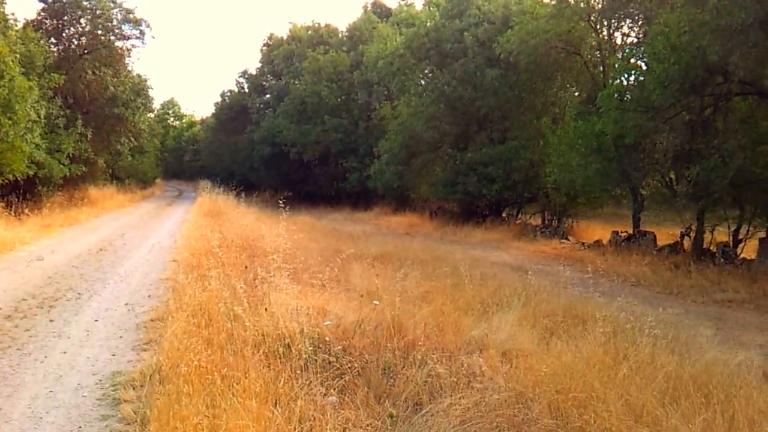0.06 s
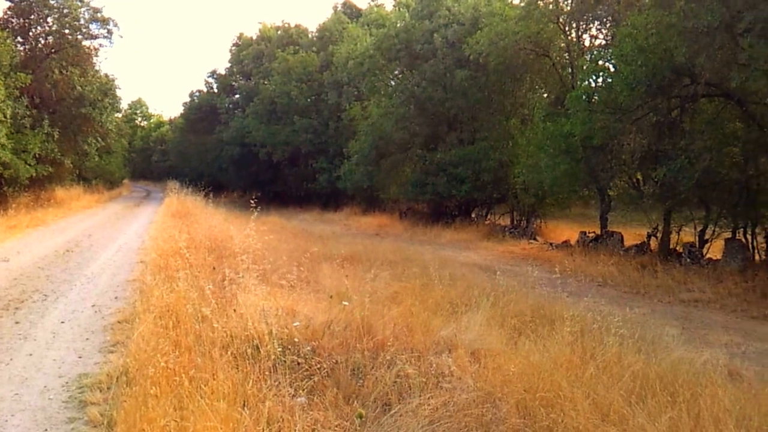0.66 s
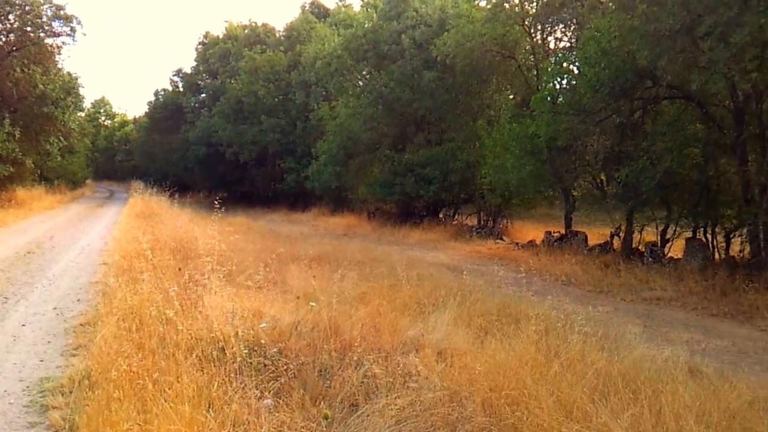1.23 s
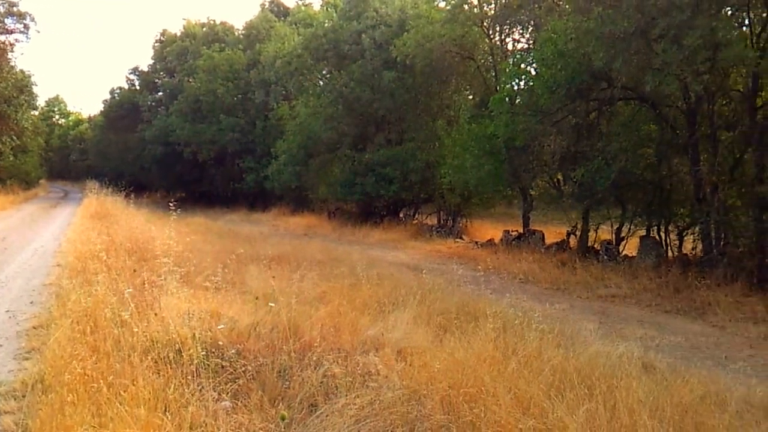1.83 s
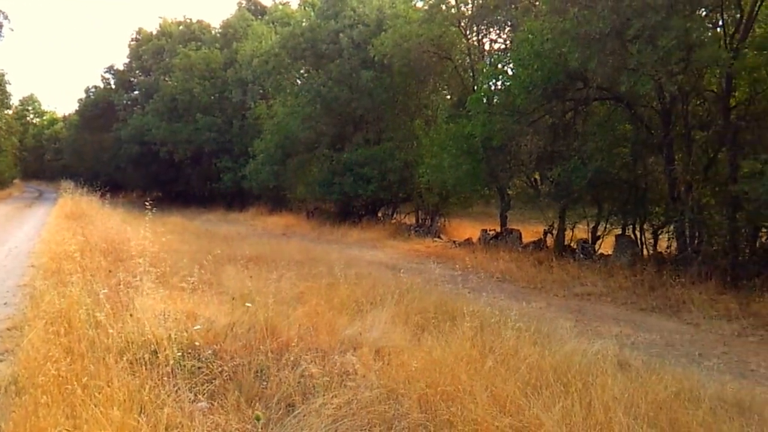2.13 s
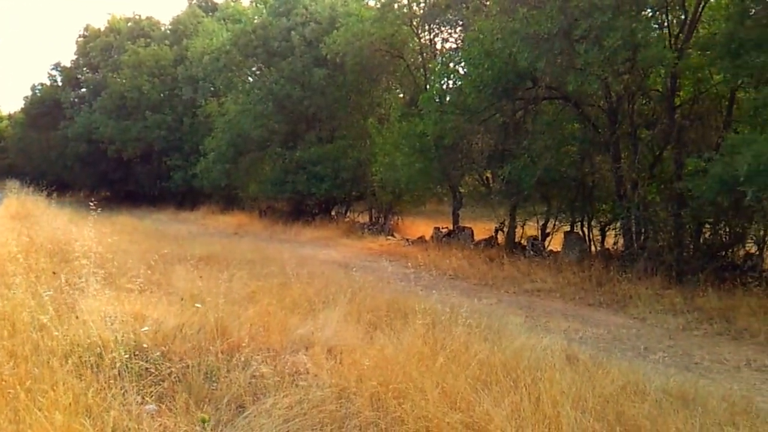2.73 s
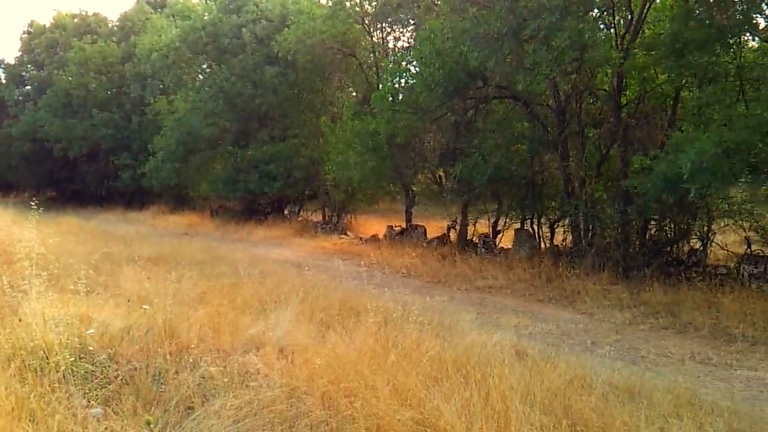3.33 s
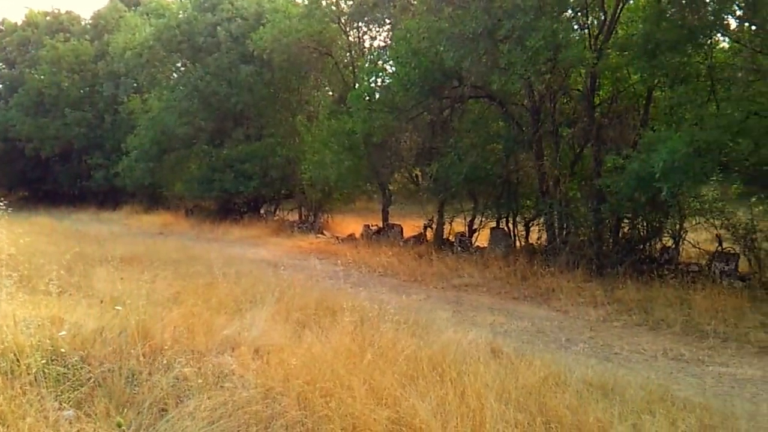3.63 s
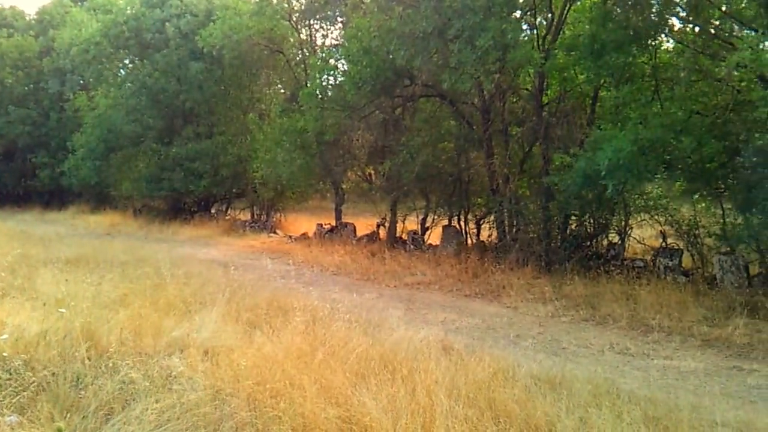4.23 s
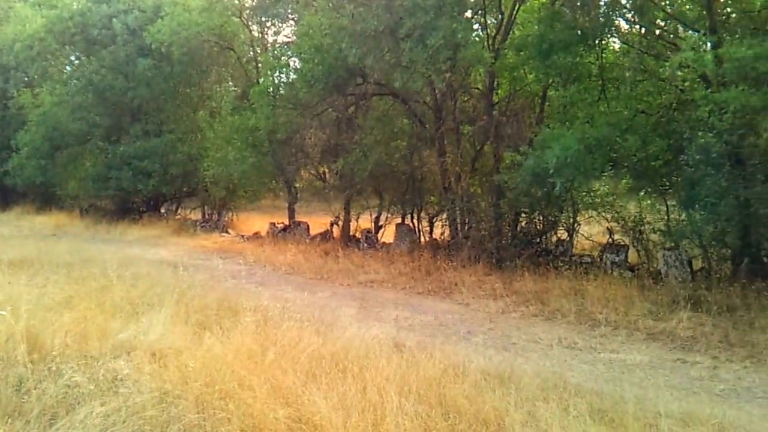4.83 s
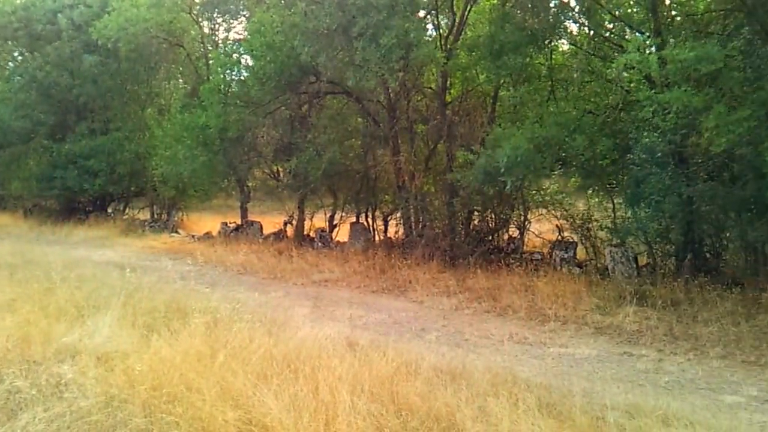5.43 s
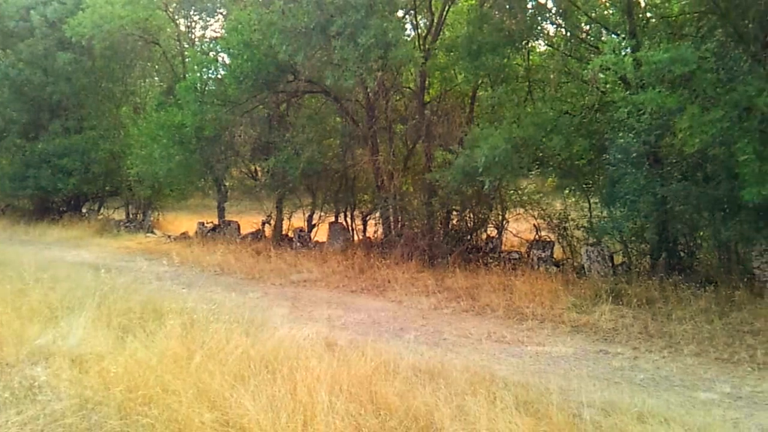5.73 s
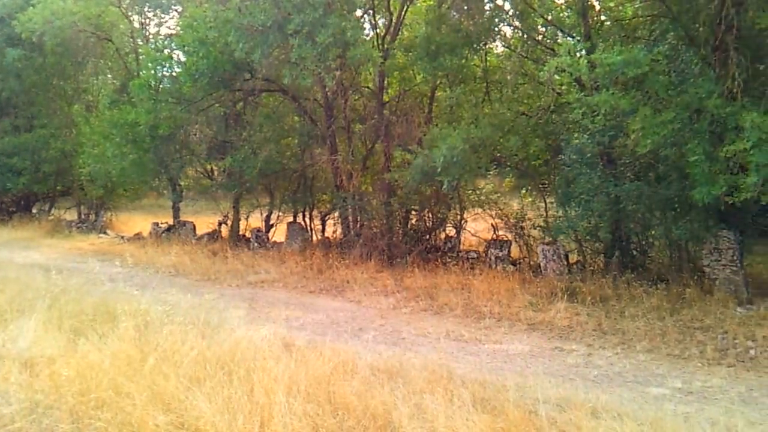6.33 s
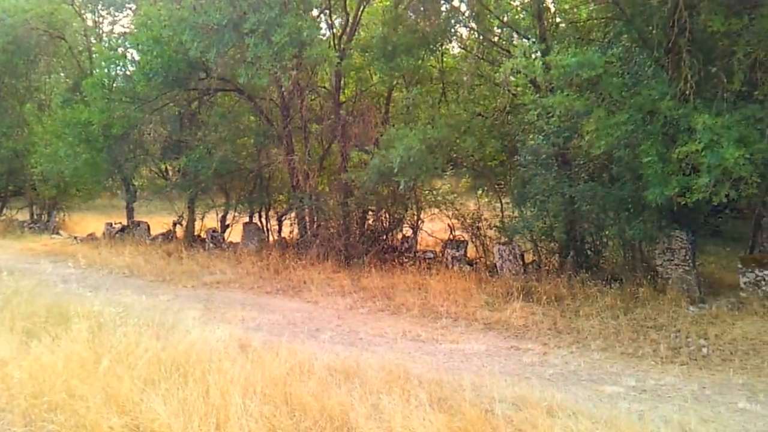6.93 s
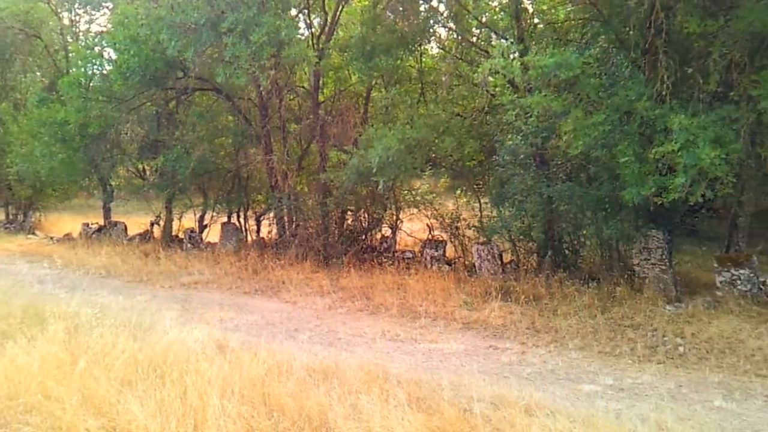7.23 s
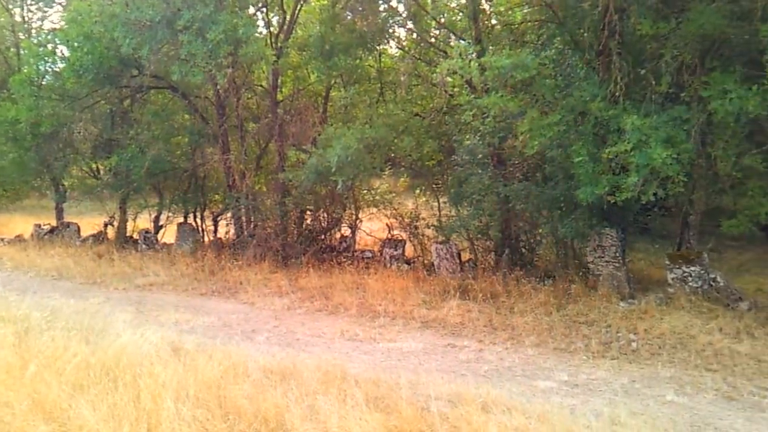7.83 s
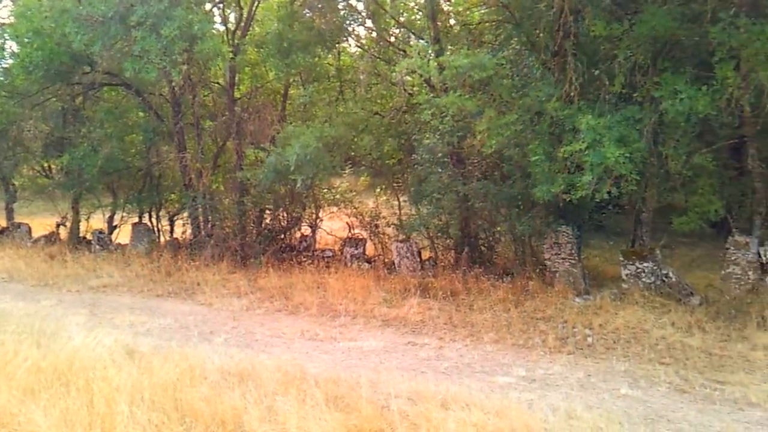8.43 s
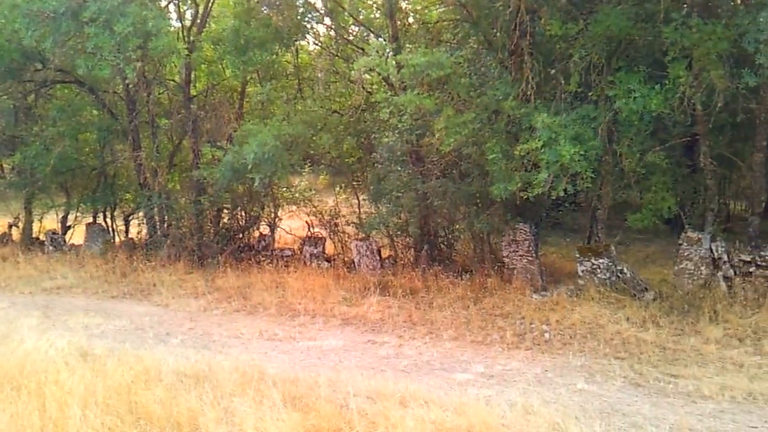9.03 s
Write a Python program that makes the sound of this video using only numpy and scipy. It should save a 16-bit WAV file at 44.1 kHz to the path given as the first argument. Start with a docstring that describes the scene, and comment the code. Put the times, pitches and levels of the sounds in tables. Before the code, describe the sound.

Short, fast songbird trills ring among trees, with faint distant bird cries and low gusts buffeting the microphone.

```python
"""A small songbird sings trills at the edge of a wood, each one a slurred, nearly pure syllable
repeated by its syrinx and scattered back by the trees. Soft hoarse notes lead into the last trill.
Other birds chip faintly, and a large bird gives two nasal cries far away. Eddies in the breeze
rumble and thump on a nearly mono microphone, over the soft hiss of open country."""
import sys
import numpy as np
from scipy import signal
from scipy.fft import rfft, irfft
from scipy.io import wavfile
from scipy.ndimage import uniform_filter1d, map_coordinates

SR = 44100
rng = np.random.default_rng(int(sys.argv[2]) if len(sys.argv) > 2 else 0)


def generate_wav(signal):
    """Clip the signal to [-1, 1] and save it as 16-bit WAV at the path in sys.argv[1]."""
    frames = np.transpose(np.atleast_2d(signal))
    scaled = np.clip(frames, -1, 1) * 32767
    pcm = np.round(scaled).astype(np.int16)
    wavfile.write(sys.argv[1], SR, pcm)


N = 404397
TIME = np.arange(N) / SR


def undb(db):
    """Decibels to gain."""
    return 10 ** (np.asarray(db) / 20)


def unit(x):
    """Scale to rms 1."""
    return x / np.std(x)


def noise(spectrum):
    """Noise of rms 1, coloured by an EQ curve of (f/Hz, level/dB) points."""
    hz, db = np.transpose(spectrum)
    bins = np.fft.rfftfreq(N, 1 / SR) + 1
    eq = undb(np.interp(np.log(bins), np.log(hz), db))
    return unit(irfft(rfft(rng.standard_normal(N)) * eq, N))


def wander(size, rate_hz):
    """Smooth random modulation with a spread near 1."""
    steps = np.arange(size) * rate_hz / SR
    return map_coordinates(rng.standard_normal(int(steps[-1]) + 2), [steps], order=2, mode="nearest")


def add(track, start_s, sound):
    """Mix a sound in at its cue."""
    i = int(np.clip(start_s * SR, 0, N))
    track[i:i + len(sound)] += sound[:N - i]


def phase_of(hz):
    """Running phase of a moving pitch."""
    return 2 * np.pi * np.cumsum(hz) / SR


# colour of the background bed: f/Hz, relative level/dB
HISS_EQ = [(45, -10.5), (160, -7), (380, -3.5), (780, -6), (1500, -8.5), (3600, -12), (8000, -13.5),
           (15000, -16.5)]


def air(level_db=-68, band_hz=(500, 15000)):
    """Even hiss of open country and microphone; level_db is its rms within band_hz."""
    hiss = noise(HISS_EQ)
    bandpass = signal.butter(4, band_hz, "band", fs=SR, output="sos")
    return hiss / np.std(signal.sosfilt(bandpass, hiss)) * undb(level_db)


# colours of the low rumble and of the small eddies: f/Hz, relative level/dB
RUMBLE_EQ = [(15, -9), (28, -0.5), (60, 1), (100, -5), (150, -16.5), (220, -33.5), (400, -57.5)]
EDDY_EQ = [(70, -1), (150, 4), (220, 1), (330, -10), (480, -25.5), (700, -33), (1100, -62)]
# gusts on the microphone: t/s, hold/s, rumble level/dB, eddy level/dB (both before trim)
GUST_CUES = [(0.527, 0.59, -64.5, -90), (1.316, .12, -56.5, -66.5), (2.22, 0.82, -74.5, -86),
             (3.406, .92, -62.5, -79.5), (4.85, 0.056, -54.5, -66), (5.245, 0.36, -69, -80),
             (5.81, 0.16, -58, -62), (6.233, .03, -54, -52), (6.275, 0.031, -44, -41),
             (6.384, .13, -42, -48.5), (6.625, 0.084, -55, -60), (6.788, 0.86, -63, -79.5),
             (7.708, 0.059, -54, -58.5), (7.8, 0.125, -62, -73), (8.132, 0.46, -55, -56.5),
             (8.269, 0.11, -52, -46.5), (8.612, .13, -44.5, -43), (8.797, 0.16, -55.5, -55.5),
             (9.011, 0.091, -48, -49)]


def breeze(rumble_trim_db=-1, eddy_trim_db=-2, patchy_db=4, puff_db=3, puff_hz=9.8, puff_drift=0.199,
           attack_s=0.019, release_s=0.028):
    """Gusts over near calm: large eddies shed in loosely regular puffs, small ones flutter in patches."""
    rumble_gain, eddy_gain = undb(-76), undb(-80.5)  # the calm between gusts
    for start, hold, rumble_db, eddy_db in GUST_CUES:
        rise = np.minimum(TIME - start, 0) / attack_s
        fall = np.maximum(TIME - start - hold, 0) / release_s
        gust = np.exp(rise - fall)
        rumble_gain = np.hypot(rumble_gain, undb(rumble_db) * gust)
        eddy_gain = np.hypot(eddy_gain, undb(eddy_db) * gust)
    puffs = np.sin(phase_of(puff_hz * (1 + puff_drift * wander(N, 7.1))))
    rumble = unit(noise(RUMBLE_EQ) * undb(puff_db * puffs))
    eddies = unit(noise(EDDY_EQ) * undb(patchy_db * wander(N, 70)))
    return rumble * rumble_gain * undb(rumble_trim_db) + eddies * eddy_gain * undb(eddy_trim_db)


# chips of other birds: t/s, length/s, start f/Hz, middle f/Hz, end f/Hz, level/dB before trim,
# octave level/dB against the tone, pitch roughness/fraction
CHIP_CUES = [(.418, .08, 3950, 4430, 4480, -71, -25, 0), (1.763, .038, 8000, 9550, 8100, -66, -40, 0),
             (1.766, .036, 5600, 7200, 6400, -60, -40, 0), (3.438, .055, 4150, 4290, 4260, -69, -4, 0),
             (4.849, .013, 5000, 7000, 10000, -59, -30, .04),
             (4.859, .017, 6000, 6450, 6300, -55, -30, .035),
             (5.283, .046, 2250, 3150, 4350, -67.5, 2, .06), (5.305, .065, 4000, 4420, 4350, -69, -25, 0)]


def chips(trim_db=3):
    """Brief whistles with their octave, bent through three pitches; pitch jitter makes some harsh."""
    out = np.zeros(N)
    for start, length, start_hz, middle_hz, end_hz, db, octave_db, rough in CHIP_CUES:
        bend = np.polyfit([0, .5, 1], [start_hz, middle_hz, end_hz], 2)
        hz = np.polyval(bend, np.linspace(0, 1, int(length * SR)))
        phase = phase_of(hz * (1 + rough * wander(len(hz), 2700)))
        tone = np.sin(phase) + undb(octave_db) * np.sin(2 * phase)
        add(out, start, tone * undb(db + trim_db) * signal.windows.tukey(len(tone), .5))
    return out


# the songbird's four syllable templates: t/ms from the bottom of the slur, f/Hz, relative level/dB
VEE_SLUR = [(-18, 5475, -17), (-12, 5050, -5), (-6, 3875, -8), (0, 3330, -18), (6, 3805, -11),
            (13, 4425, 0), (20, 5465, -3), (25, 6600, 1), (29, 6100, -11)]
SWOOP_SLUR = [(-67, 7050, -18), (-61, 5800, -8), (-55, 4795, -1), (-47, 4250, 0), (-30, 4085, -3),
              (-14, 3480, -7), (-5, 3150, -9.5), (3, 3100, -10.5), (9, 3400, -11), (20, 4370, -3),
              (36, 4560, 1), (45, 5150, -1), (51, 6350, -4), (55, 6400, -14)]
CUP_SLUR = [(-23, 4470, -5), (-16, 5020, -5), (-8, 4005, -3), (0, 3850, -3.5), (8, 4245, -2),
            (17, 4840, -2), (23, 5940, -5), (27, 6890, -1), (34, 5990, -3)]
STEP_SLUR = [(-17, 4495, -15), (-8, 3940, -5), (0, 3600, -8), (6, 4220, -9), (12, 4930, -8), (24, 4950, -1),
             (30, 5750, 0), (37, 7200, -10), (46, 6700, -17)]
# syllables sung on each template: t/s, bottom f/Hz, closing flick's top f/Hz, level/dB before trim
VEE_CUES = [(0.756, 3350, 6570, -48), (0.829, 3350, 6330, -43), (0.9047, 3330, 6550, -45.5),
            (0.9868, 3380, 6360, -42.5), (1.0723, 3200, 6580, -41.5), (1.1532, 3350, 6560, -42),
            (6.059, 3500, 6420, -53.5), (6.13, 3380, 6590, -49.5), (6.2066, 3350, 6380, -46),
            (6.284, 3400, 6490, -45), (6.3604, 3300, 6500, -47), (6.4376, 3400, 6440, -48.5),
            (6.5196, 3330, 6540, -47), (6.6029, 3330, 6420, -49)]
SWOOP_CUES = [(2.0479, 3115, 6420, -38.5), (2.2309, 3070, 5500, -39.5), (2.41, 3050, 6100, -39.5),
              (2.6058, 3084, 6100, -40), (2.79, 3050, 5820, -40)]
CUP_CUES = [(6.8082, 4190, 7020, -57.5), (6.914, 3820, 6850, -57.5), (7.015, 3810, 6720, -57.5),
            (7.119, 3880, 6400, -56.5), (7.2236, 3790, 6900, -57), (7.3301, 3880, 6630, -58),
            (7.4352, 3740, 6530, -58)]
STEP_CUES = [(8.551, 3700, 7150, -37.5), (8.6513, 3600, 7220, -40.5), (8.7565, 3540, 6910, -41),
             (8.8601, 3570, 7200, -40), (8.962, 3590, 7150, -39.5), (9.0629, 3650, 7160, -39),
             (9.166, 3600, 7200, -39)]


def trill(slur, cues, trim_db, octave_db, waver=0.0063, flutter_db=1.5, body_hz=4800, pause_s=.5,
          octave_knee_hz=3700, octave_db_per_khz=-21):
    """The syrinx slurs a nearly pure tone through the same shape, a little differently each time."""
    slur_ms, slur_hz, slur_db = np.transpose(slur)
    knots = slur_ms / 1000
    out, previous_s = np.zeros(N), -np.inf
    for cue_s, bottom_hz, top_hz, db in cues:
        opens_trill = cue_s - previous_s > pause_s
        previous_s = cue_s
        stretch = .94 if opens_trill else 1  # the first syllable is a little hurried
        t = np.arange(knots[0], knots[-1], 1 / (SR * stretch))
        hz = np.interp(t, knots, slur_hz)
        level_db = db + np.interp(t, knots, slur_db) + flutter_db * wander(len(t), 180.7)
        if opens_trill:  # its lead-in is capped in pitch, and it swells from soft
            hz = np.where(t < 0, np.minimum(hz, 5300), hz)
            level_db += np.linspace(-12, 0, len(t))
        # the body of the syllable repeats closely; its dip and closing flick vary in reach
        low, high = hz.min(), hz[t > 0].max()
        dip_shift = np.interp(hz, [low, body_hz], [bottom_hz - low, 0])
        flick_shift = (t > 0) * np.interp(hz, [body_hz, high], [0, top_hz - high])
        hz = hz + dip_shift + flick_shift
        glide_hz = uniform_filter1d(hz, size=130, mode="nearest")
        phase = phase_of(glide_hz * (1 + waver * wander(len(t), 250)))
        # the throat lets the octave through in the dips and shuts it out higher up
        above_khz = np.maximum(hz - octave_knee_hz, 0) / 1000
        tone = np.sin(phase) + undb(octave_db + octave_db_per_khz * above_khz) * np.sin(2 * phase)
        envelope = undb(level_db + trim_db) * signal.windows.tukey(len(t), .05)
        add(out, cue_s + knots[0] * stretch, tone * envelope)
    return out


# the hardest wind thumps: t/s, relative level/dB, eddy passing time/s
BUFFET_CUES = [(1.361, -46, 0.0024), (5.935, -43, 0.0021), (6.285, -32.5, 0.0007), (6.296, -22.5, 0.0011),
               (6.394, -26.5, 0.00091), (6.41, -36, 0.0011), (6.468, -28.5, 0.00084),
               (6.491, -36.5, 0.00087), (6.634, -39.5, 0.0017), (6.655, -40, 0.0011),
               (8.283, -30.5, 0.0011), (8.307, -36, 0.0011), (8.626, -30.5, 0.00095), (8.678, -31, 0.00067),
               (8.719, -23.5, 0.0011), (8.756, -35, 0.0011), (8.939, -37.5, 0.0014)]


def buffets(core_size=0.56, core_db=-11, trim_db=3):
    """An eddy crossing the microphone port sucks, then pushes; its tight core hardens the thump."""
    out = np.zeros(N)
    t = np.arange(-SR // 100, SR // 100) / SR
    for cue_s, db, passing_s in BUFFET_CUES:
        u = t / passing_s
        eddy = u * np.exp(-u ** 2 / 2)
        core = u / core_size * np.exp(-(u / core_size) ** 2 / 2)
        add(out, cue_s + t[0], (eddy + undb(core_db) * core) * undb(db + trim_db))
    return out


# hoarse notes, most leading into the last trill: t/s, length/s, centre f/Hz, level/dB before trim
RASP_CUES = [(1.653, 0.051, 3850, -74), (8.156, 0.057, 3280, -65.5), (8.236, 0.042, 3100, -66),
             (8.303, 0.05, 3070, -65), (8.383, 0.047, 3090, -66), (8.468, 0.053, 3070, -65)]


def rasps(rough=0.032, hook_depth=0.105, hiss_db=-3, trim_db=1):
    """Soft hoarse notes that rise and hook down, with a throaty hiss swelling above them."""
    out = np.zeros(N)
    hiss = noise([(2600, -40), (3300, -4), (4400, -5), (5300, -7), (6200, -3), (7200, -37)])
    for start, length, centre_hz, db in RASP_CUES:
        u = np.linspace(0, 1, int(length * SR))
        hook = 1 + hook_depth * np.interp(u, [0, .75, 1], [-1, .6, -1])
        hz = centre_hz * hook * (1 + rough * wander(len(u), 912))
        i = int(start * SR)
        voice = np.sin(phase_of(hz)) + undb(hiss_db) * np.sqrt(2 * u) * hiss[i:i + len(u)]
        add(out, start, voice * undb(db + trim_db) * signal.windows.tukey(len(u), .5))
    return out


# throat resonances of the large bird: f/Hz, relative level/dB
THROAT_EQ = [(400, -30), (820, -10), (1200, 1.5), (1650, -9), (2100, -40), (2750, -7.5), (3200, -22)]
# its cries: t/s, length/s, start f/Hz, top f/Hz, end f/Hz, level/dB before trim, hoarse harmonics/dB
CRY_CUES = [(4.752, .4, 388, 402, 368, -64.5, -4), (5.808, .41, 370, 416, 364, -66, 2)]


def cries(fade_db=-5, beak_lift=.25, rough=.045, hoarse=.9, rattle_hz=55, trim_db=2.5):
    """A nasal cry lifts and sags; the throat favours harmonic three, the others are hoarse and rattle."""
    out = np.zeros(N)
    throat_hz, throat_db = np.transpose(THROAT_EQ)
    harmonic = np.arange(1, 9)[:, None]
    for start, length, start_hz, top_hz, end_hz, db, hoarse_db in CRY_CUES:
        u = np.linspace(0, 1, int(length * SR))
        hz = np.interp(u, [0, .1, .35, 1], [start_hz, top_hz, top_hz, end_hz])
        phase = phase_of(hz * (1 + rough * (.5 + u) * wander(len(u), 400)))
        # the opening beak lifts the upper resonance
        lift = 1 + beak_lift * (u - .25) * (harmonic > 5)
        throat = undb(np.interp(harmonic * hz / lift, throat_hz, throat_db))
        pulses = (1 + np.sin(phase_of(np.full(len(u), rattle_hz)))) / 2
        rattle = pulses * (1 + hoarse * wander(len(u), 350))
        gains = throat * np.where(harmonic == 3, 1, undb(hoarse_db) * rattle)
        voice = np.sum(gains * np.sin(harmonic * phase), axis=0)
        envelope = undb(db + trim_db + fade_db * u ** 2) * signal.windows.tukey(len(u), .1)
        add(out, start, voice * envelope)
    return out


def trees(x, tail_db, t60_s, near_db, build_s=0.0046, near_s=0.013, patchy_db=2):
    """Direct sound, quick scatter off twigs and ground, then a clumpy tail off trunks and crowns."""
    t = TIME[:SR]
    near, tail = rng.standard_normal((2, SR))
    near *= np.exp(-t / near_s) * (1 - np.exp(-t / 0.002))
    tail *= np.exp(-np.log(1000) * t / t60_s) * (1 - np.exp(-t / build_s))
    tail *= undb(patchy_db * wander(SR, 150))
    # leaves are small and throw back more treble than bass
    tail = np.diff(tail / np.linalg.norm(tail), prepend=0)
    response = undb(near_db) * near / np.linalg.norm(near) + undb(tail_db) * tail
    return x + signal.fftconvolve(x, response)[:N]


def scene(deeper_s=4):
    """Birds at their distances among the trees, the breeze right at the microphone."""
    vee = trill(VEE_SLUR, VEE_CUES, trim_db=1.5, octave_db=-36)
    birds = trees(vee * (TIME < deeper_s), tail_db=-8.5, t60_s=0.56, near_db=-9)
    # the second vee trill comes from deeper in the wood
    birds += trees(vee * (TIME >= deeper_s), tail_db=-2.5, t60_s=0.67, near_db=-6)
    swoop = trill(SWOOP_SLUR, SWOOP_CUES, trim_db=3, octave_db=-27)
    birds += trees(swoop, tail_db=-5.5, t60_s=0.67, near_db=-13)
    cup = trill(CUP_SLUR, CUP_CUES, trim_db=4.5, octave_db=-38)
    birds += trees(cup, tail_db=2, t60_s=0.9, near_db=-2.5)
    step = trill(STEP_SLUR, STEP_CUES, trim_db=2.5, octave_db=-38)
    birds += trees(step, tail_db=-2.5, t60_s=0.77, near_db=-10)
    birds += trees(chips() + rasps(), tail_db=-6, t60_s=.6, near_db=-17)
    birds += trees(cries(), tail_db=7, t60_s=.5, near_db=-16)
    mid = birds + breeze() + buffets() + air()
    side = undb(-100) * rng.standard_normal(N)  # a faint, even noise gives the only stereo width
    return np.array([mid + side, mid - side])


def record(dry, cutoff_hz=15550):
    """A steep low-pass cuts the top off the mix."""
    return signal.sosfilt(signal.ellip(12, .1, 70, cutoff_hz, fs=SR, output="sos"), dry)


dry = scene()
out = record(dry)
generate_wav(out)
```